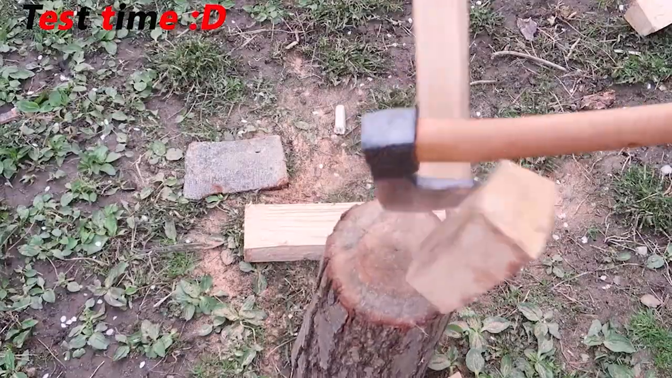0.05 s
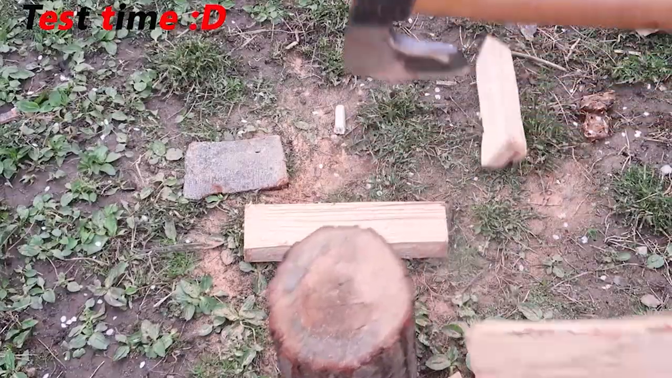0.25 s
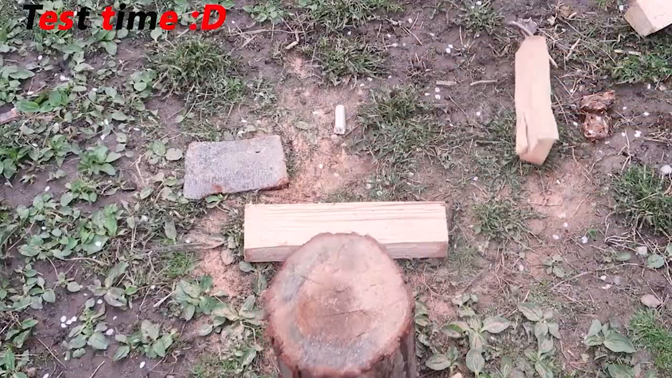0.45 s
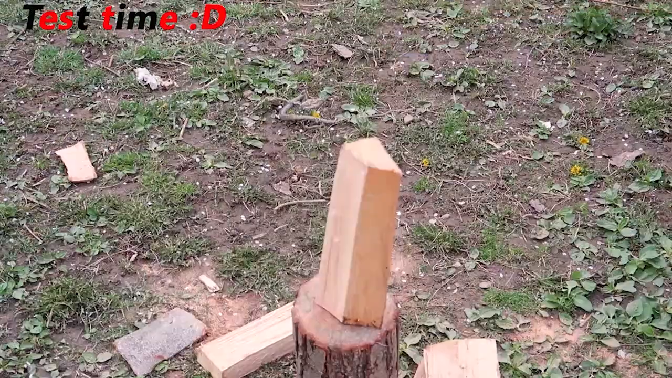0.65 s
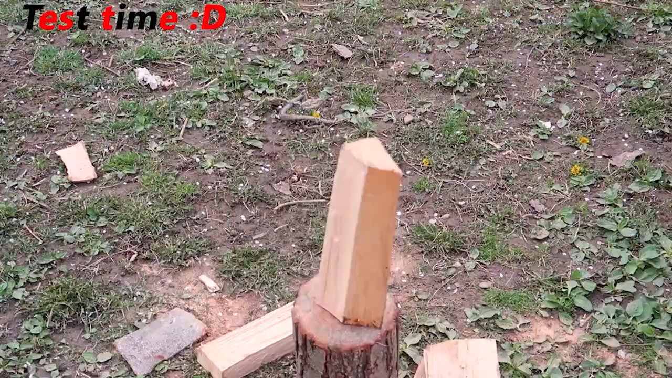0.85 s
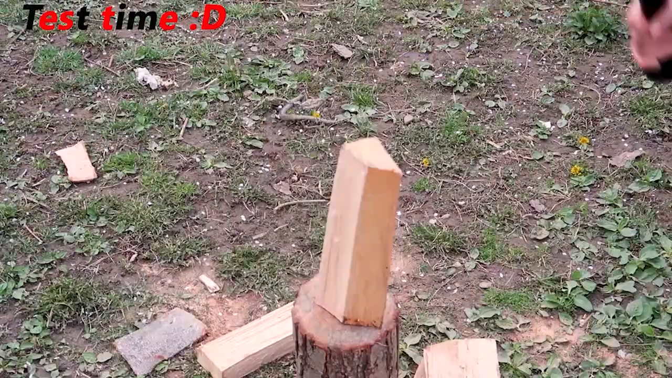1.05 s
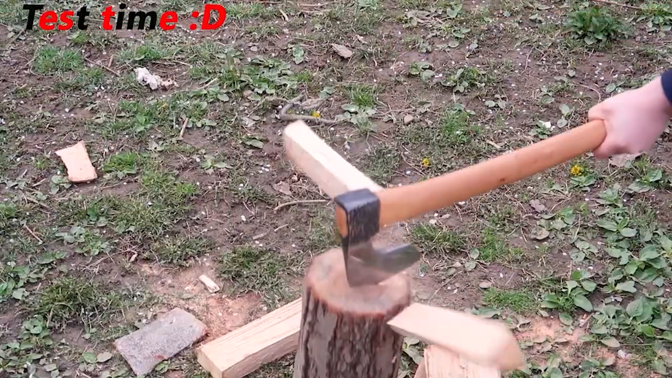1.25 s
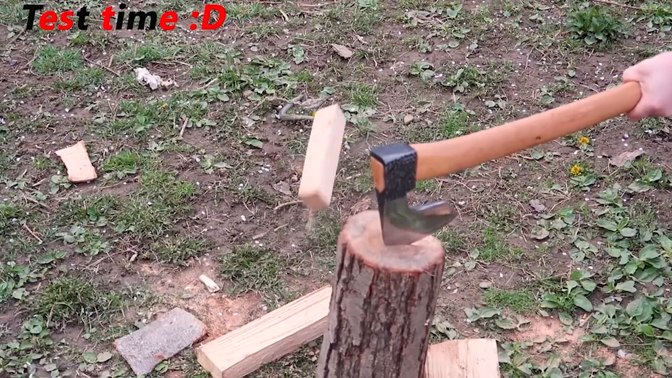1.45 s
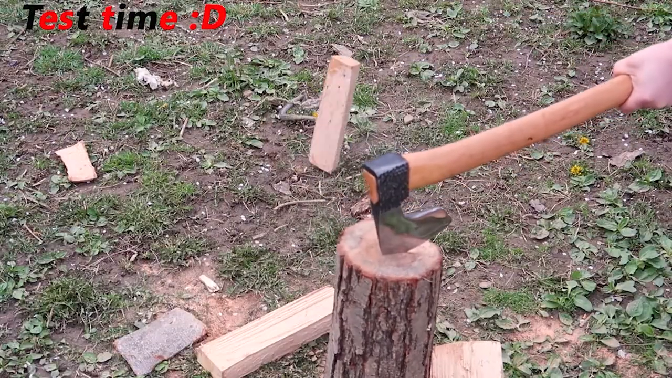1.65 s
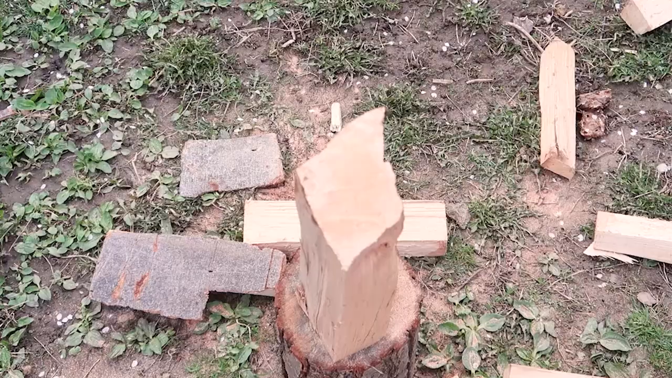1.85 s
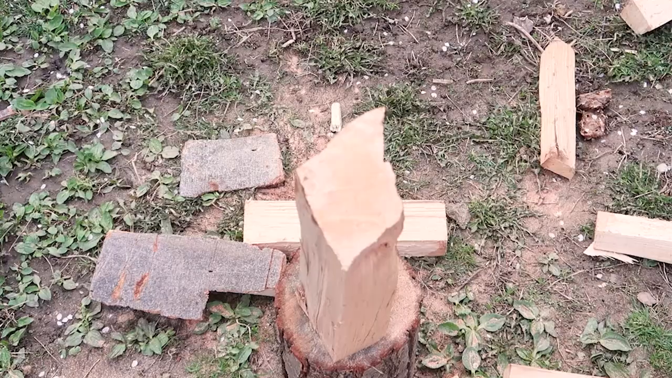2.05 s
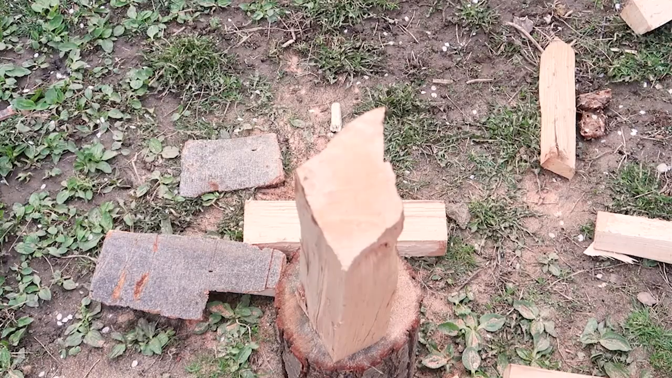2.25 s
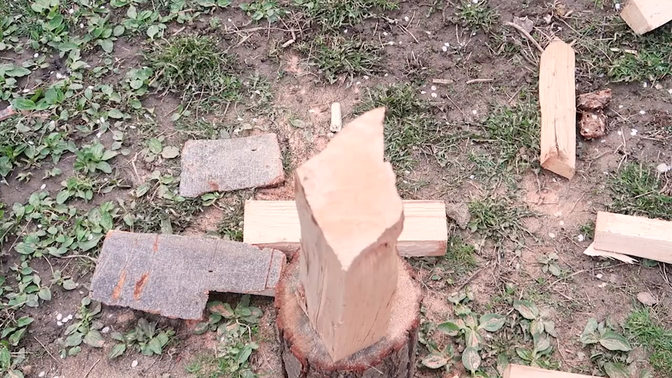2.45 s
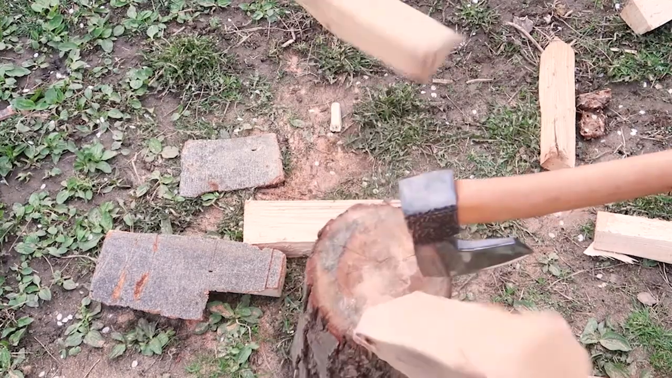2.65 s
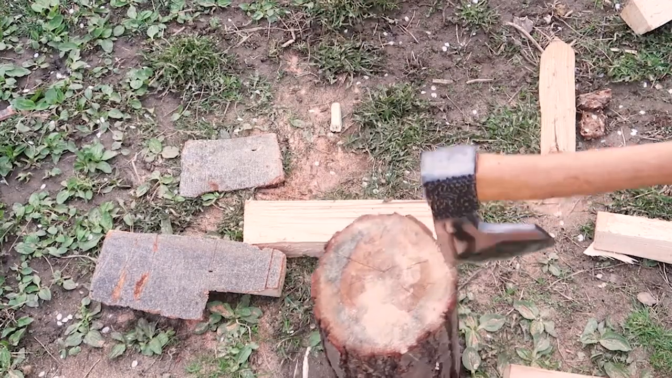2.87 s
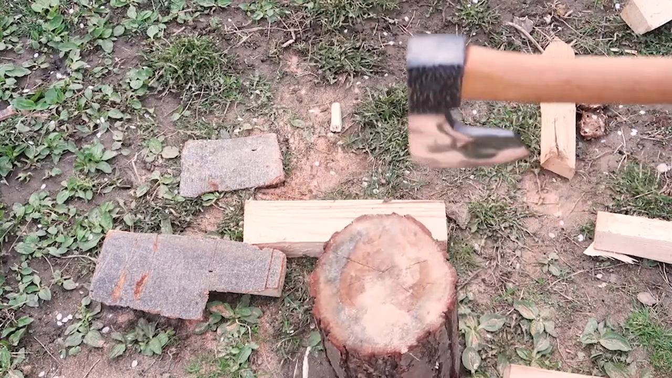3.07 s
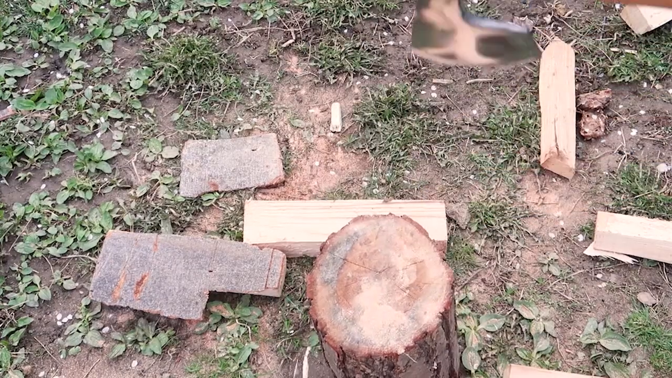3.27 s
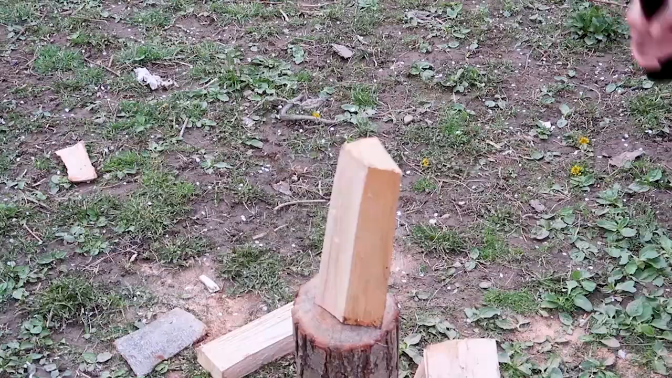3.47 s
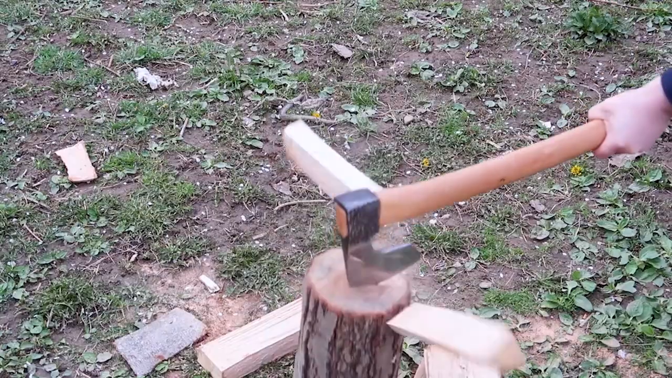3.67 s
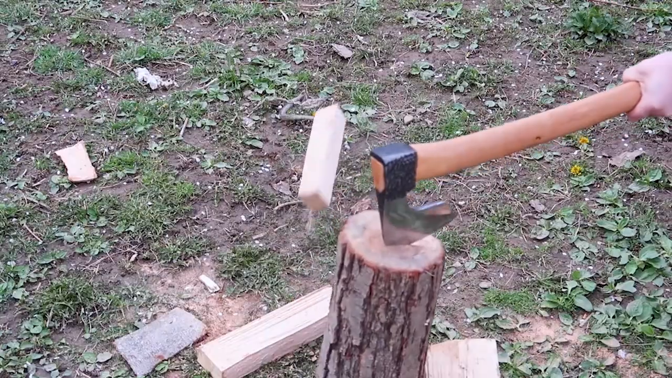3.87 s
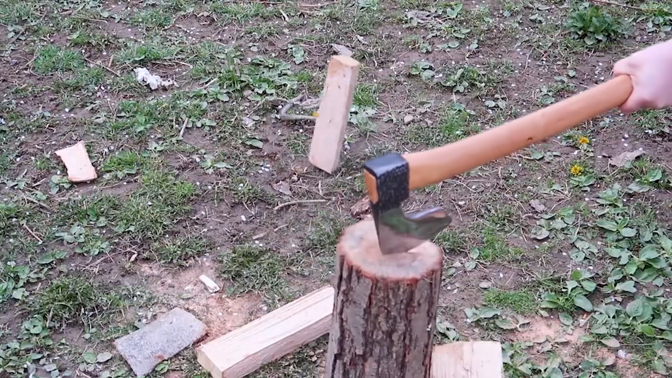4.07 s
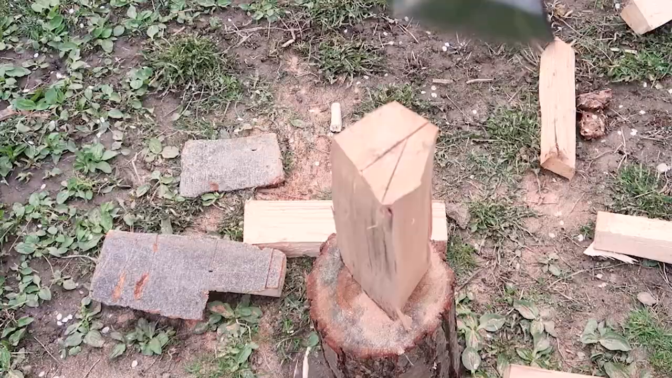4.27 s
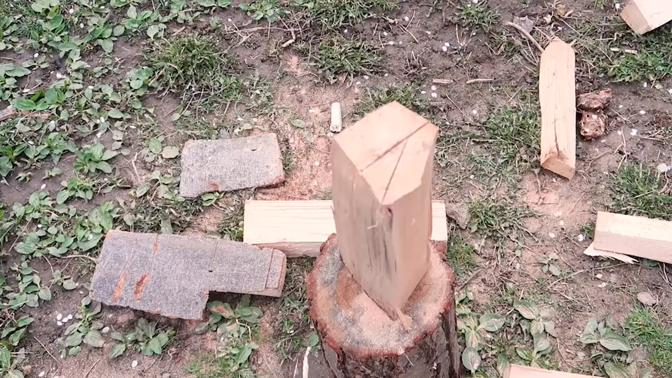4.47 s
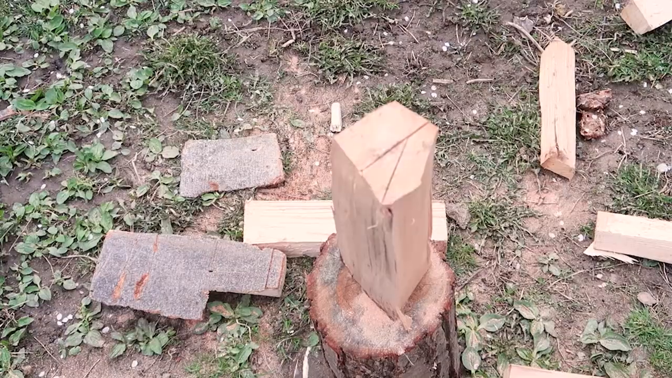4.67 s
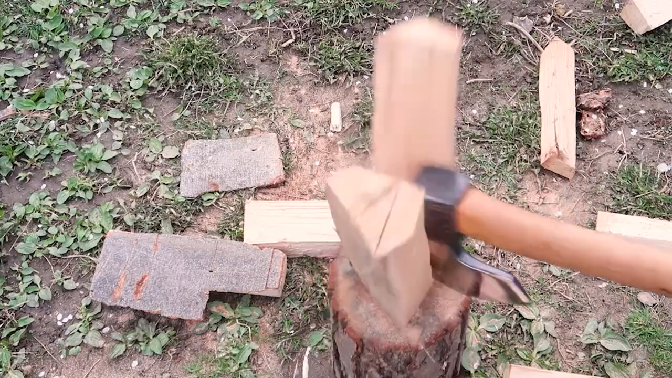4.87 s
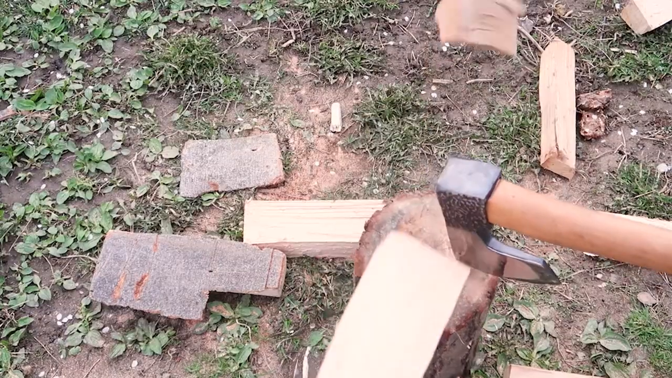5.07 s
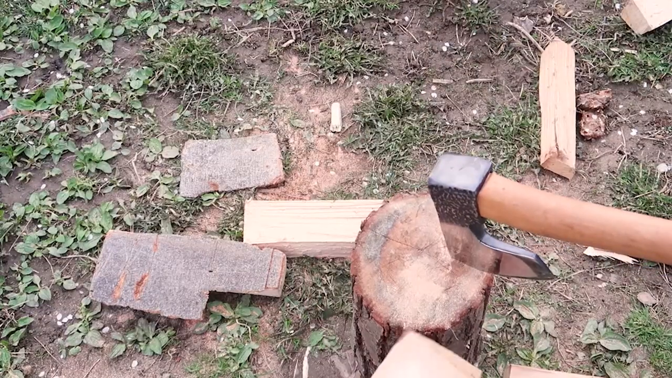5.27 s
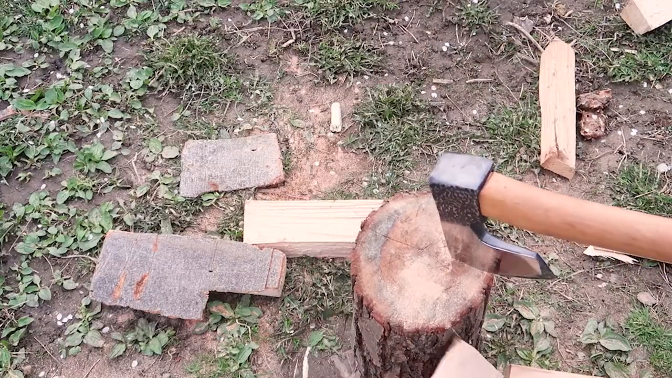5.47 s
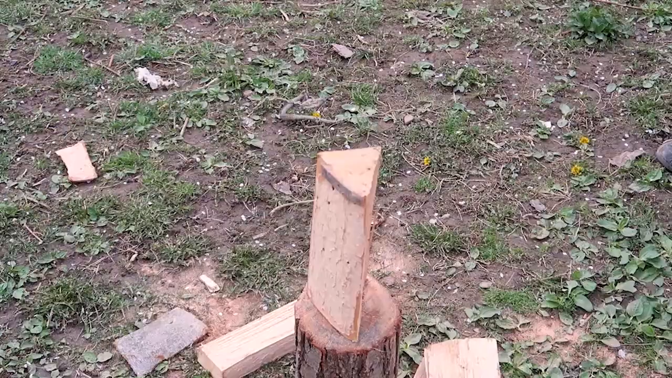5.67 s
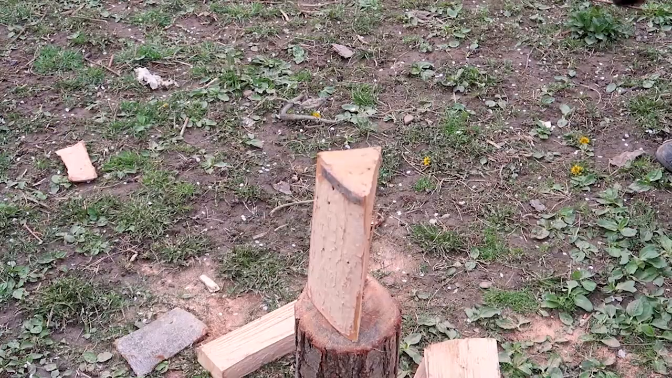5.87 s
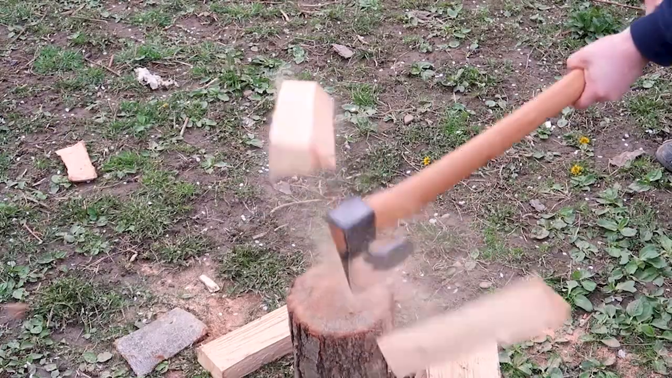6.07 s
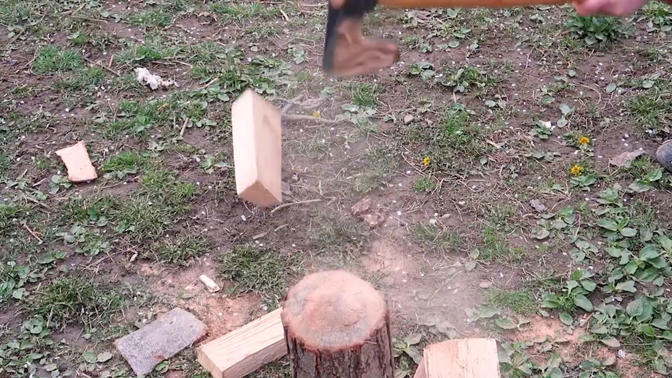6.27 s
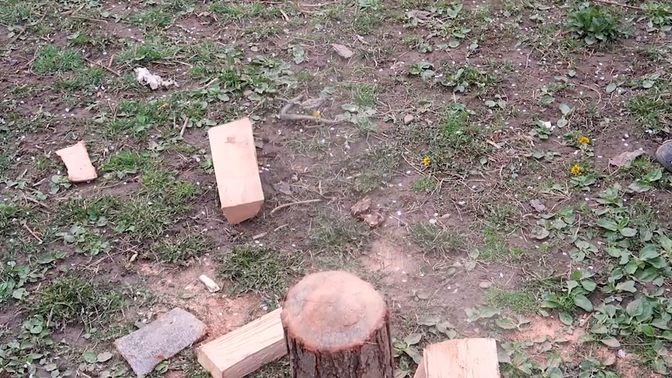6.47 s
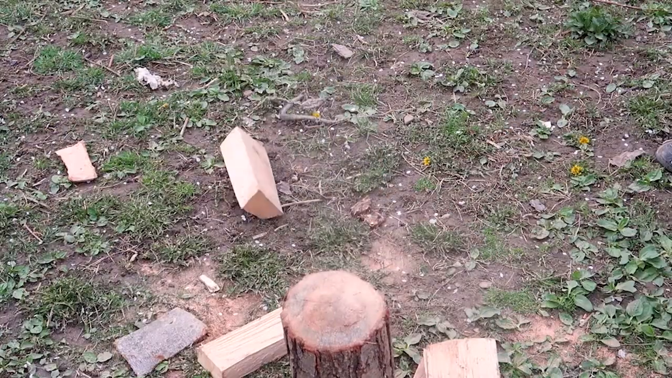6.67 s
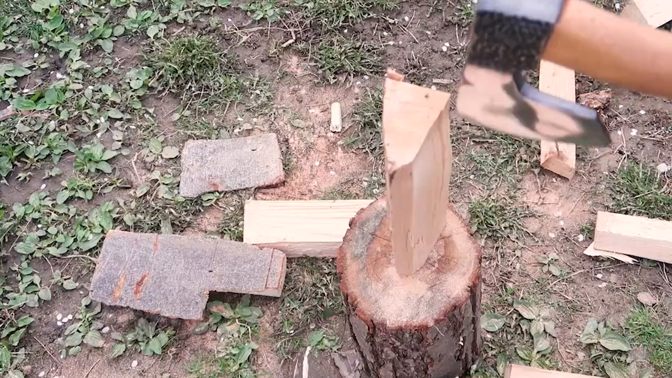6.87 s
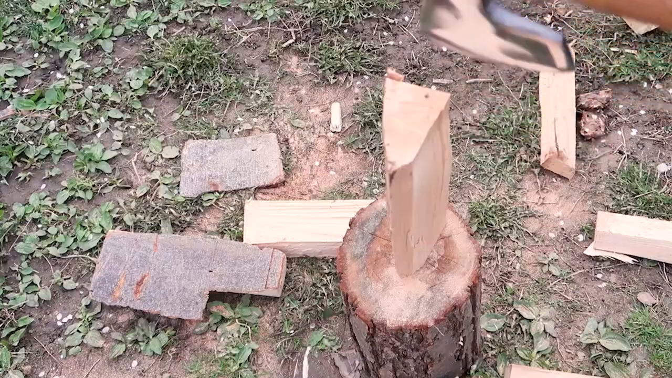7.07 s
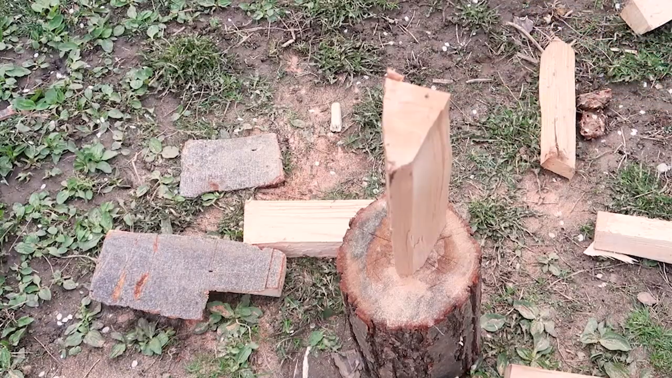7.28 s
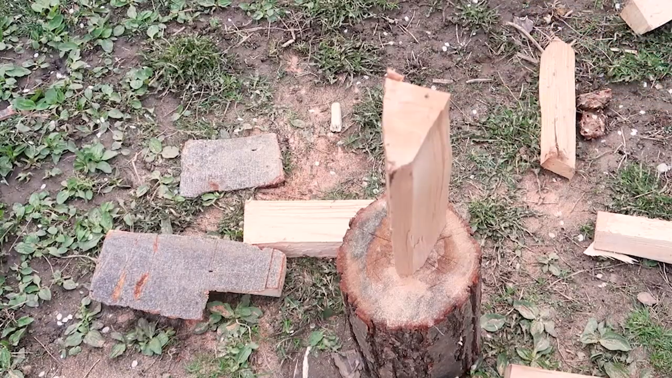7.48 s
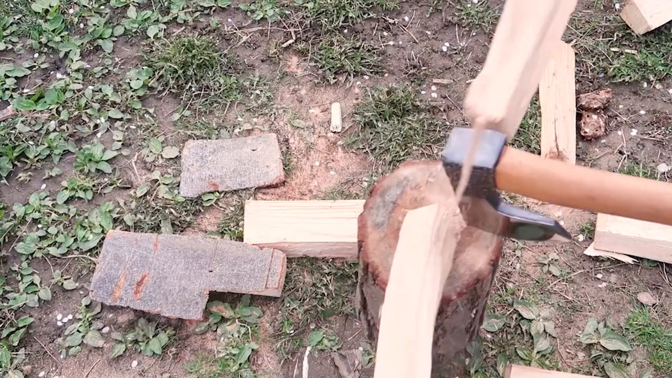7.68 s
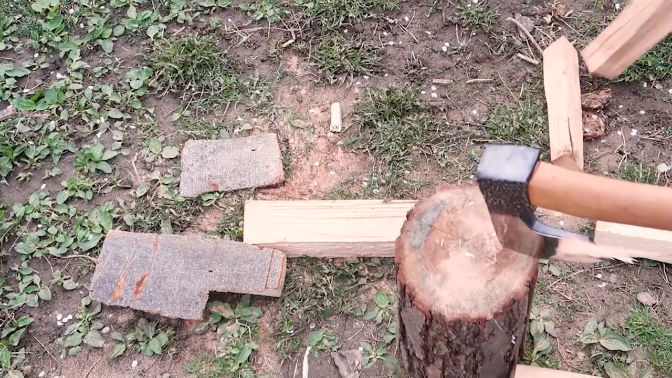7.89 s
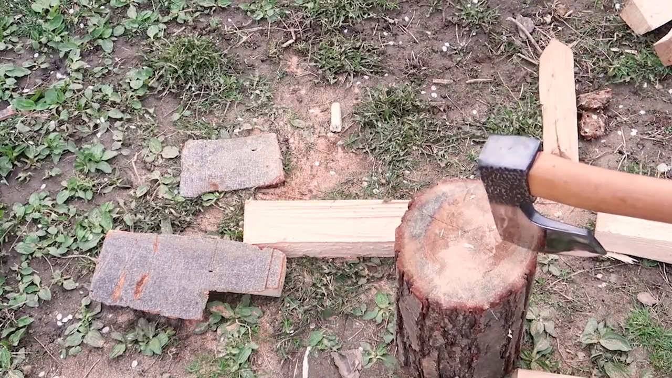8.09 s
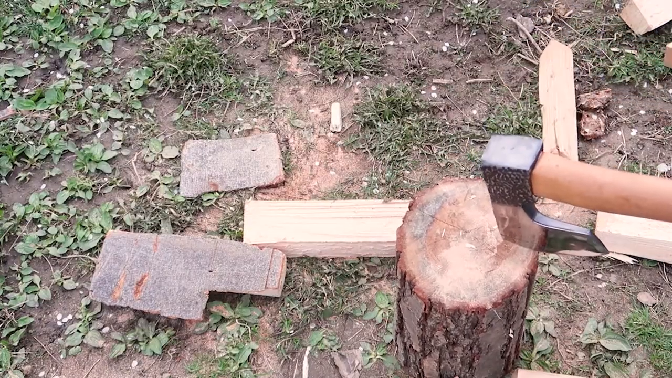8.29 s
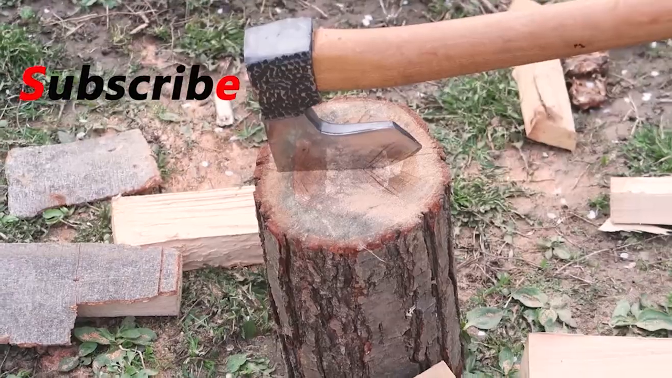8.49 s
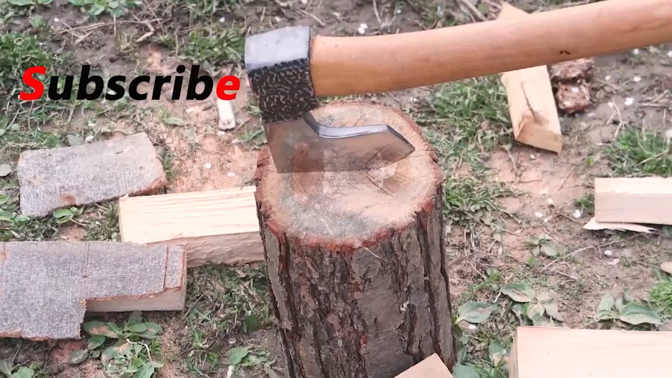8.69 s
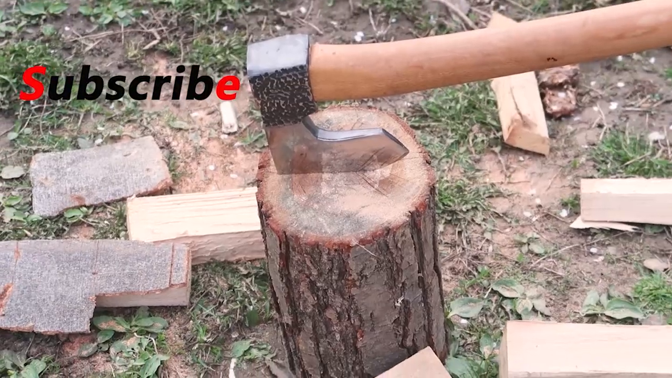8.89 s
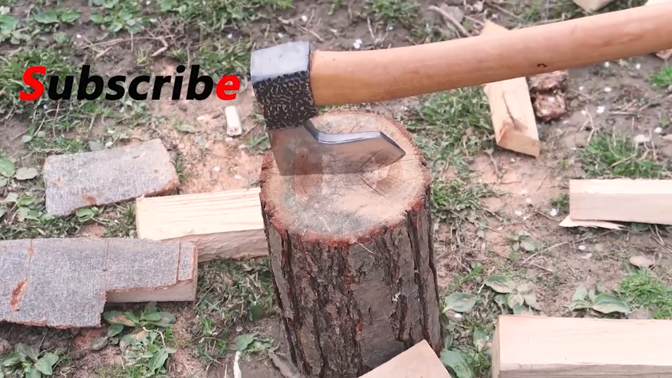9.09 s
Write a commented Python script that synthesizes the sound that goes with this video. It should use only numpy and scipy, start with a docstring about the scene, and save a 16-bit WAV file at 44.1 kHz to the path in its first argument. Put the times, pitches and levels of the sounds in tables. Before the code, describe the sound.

In a quiet yard, a hatchet repeatedly cracks small billets on a log block, close to the microphone and slightly distorted at the peaks. After each blow, loose pieces clack on wood, drop with dull thuds and rustle leaves, while tiny chips tick. Short slapping echoes return. Distant birds slur downward between blows over light wind, airy hiss and a changing engine-like drone; the ending is calm.

```python
"""Splitting firewood in a yard

A hatchet splits billets on a log block, overloading the microphone: band noise cracks over damped modes.
Sticks knock and ring, then land with a thud and rustle; chips patter. Random taps make the yard's echo.
The stretch with the second chop plays again once. Behind: falling bird whistles and one faint hoot
(gliding sines), light wind and far air (coloured noise), and a low far hum (wandering harmonics).
"""
import sys
import numpy as np
from scipy import signal
from scipy.fft import rfft, irfft
from scipy.io import wavfile
from scipy.ndimage import uniform_filter1d

SR = 44100
rng = np.random.default_rng(int(sys.argv[2]) if len(sys.argv) > 2 else 0)


def unload_audio(sound):
    """Save the sound as a 16-bit wav file, at the path given as the first command line argument."""
    columns = np.transpose(np.atleast_2d(sound))
    # keep every value between -1 and 1, then stretch to whole-number steps
    steps = np.round(np.clip(columns, -1, 1) * 32767)
    wavfile.write(sys.argv[1], SR, steps.astype(np.int16))


N = 403069
CROSSFADE_S = 0.03


def amp(db):
    """Converts dB to amplitude."""
    return 10 ** (np.asarray(db) / 20)


def evened(x):
    """Scales to rms 1."""
    return x / np.sqrt(np.mean(x ** 2) + 1e-20)


def read(points, hz):
    """Interpolates a curve on a log-frequency axis."""
    f, value = np.transpose(points)
    return np.interp(np.log(hz + 1), np.log(f + 1), value)


def add(mix, start_s, sound):
    """Mixes a mono or stereo sound in at start_s."""
    part = mix[:, max(round(start_s * SR), 0):][:, :sound.shape[-1]]
    part += sound[..., :part.shape[-1]]


def spread(pair, side_db):
    """Two unrelated signals become middle and side of a stereo pair."""
    mid, side = pair
    return mid + amp(side_db) * side * np.array([[1], [-1]])


def noise(spectrum, side_db):
    """Steady stereo noise of a given colour, rms 1."""
    colour = amp(read(spectrum, np.fft.rfftfreq(N, 1 / SR)))
    pair = irfft(rfft(rng.standard_normal((2, N))) * colour, N)
    return evened(spread(pair, side_db))


def drift(rate_hz):
    """Slow random wavering, rms 1."""
    hz = np.fft.rfftfreq(N, 1 / SR)
    lowpass = np.exp(-(hz / rate_hz) ** 2)
    return evened(irfft(rfft(rng.standard_normal(N)) * lowpass, N))


def swelling(base_db, swells):
    """Gain of a base level with bell-shaped swells added in power."""
    t = np.arange(N) / SR
    power = amp(base_db) ** 2
    for centre_s, db, half_s in swells:
        power = power + amp(db) ** 2 * np.exp(-((t - centre_s) / half_s) ** 2)
    return np.sqrt(power)


def together(a_db, b_db):
    """Level of two unrelated sounds at once."""
    return 20 * np.log10(np.hypot(amp(a_db), amp(b_db)))


def ring(modes, t):
    """Damped modes of a struck piece of wood."""
    return sum(amp(db - 60 * t / t60_s) * np.sin(2 * np.pi * hz * t) for hz, db, t60_s in modes)


# contact bands: (low edge [Hz], high edge [Hz])
BANDS_HZ = [(85, 300), (300, 1200), (1200, 3500), (3500, 7000), (7000, 15500)]


def tilted(colour_db, db, brightness_db_per_octave=0):
    """Band levels of a contact, tipped about 1 kHz by its brightness."""
    centre_hz = np.sqrt(np.prod(BANDS_HZ, axis=1))
    octaves = np.log2(centre_hz / 1000)
    return np.array(colour_db) + db + brightness_db_per_octave * octaves


# stereo width of a contact, per band: side re mid [dB]
SIDE_DB = [-25, -30.5, -15.5, -9.5, -3.5]


def crunch(levels_db, decay_s, rise_s, grain=0.59, top_hz=10500):
    """Snapping fibres or grit: uneven noise under a brief force, band by band."""
    t = np.arange(SR // 10) / SR
    force = (1 - np.exp(-t / rise_s)) * np.exp(-t / decay_s)
    out = np.zeros((2, len(t)))
    for band_hz, db, side_db in zip(BANDS_HZ, levels_db, SIDE_DB):
        snaps = rng.standard_normal((2, len(t))) * np.exp(grain * rng.standard_normal(len(t)))
        bandpass = signal.butter(4, band_hz, "bandpass", fs=SR, output="sos")
        mid, side = signal.sosfilt(bandpass, snaps * force)
        # level refers to power over 10 ms, the buffer is 100 ms
        out += amp(db) * spread([evened(mid), evened(side)], side_db) / np.sqrt(10)
    return signal.lfilter(*signal.butter(2, min(top_hz, SR / 3), fs=SR), out)


def contact(levels_db, decay_s, grit_db=-12, grit_decay_s=0.013):
    """A short crunch plus longer, sparser grit."""
    hit = crunch(levels_db, decay_s, rise_s=0.0033)
    grit = crunch(levels_db, grit_decay_s, rise_s=0.0033, grain=3.3)
    return hit + amp(grit_db) * grit


# hatchet blows: (time [s], ring swell [ms], crack gain [dB], brightness [dB/octave], block thud gain [dB],
# crack decay [s], send to yard [dB])
CHOPS = [(.019, 1.84, -15.5, -1.65, -41, 0.0025, 1.5), (1.2455, 2.16, -16.5, -2.5, -27.5, 0.002, 1),
         (2.6052, 2.02, -14.5, -0.73, -22.5, 0.0017, 2.5), (4.9507, 1.7, -18, 1.3, -23.5, .0036, 0.5),
         (6.069, 2.3, -19, 1.1, -34.5, .0034, 4.5), (7.6357, 1.43, -18.2, 2.25, -35.5, .0025, 0.5)]
# modes of each billet on the block, one table per chop: (frequency [Hz], relative level [dB], t60 [s])
BILLET_1 = [(562, 13, 0.013), (668, 11, 0.017), (920, 0, 0.023), (1170, 21, 0.0065), (1460, -7.5, 0.038),
            (2077, -18.5, 0.028), (2170, 1, 0.0091), (3060, -12.5, 0.014), (3400, -18, 0.012),
            (4850, -15, 0.019)]
BILLET_2 = [(320, 13.5, 0.0074), (622, 12.5, 0.011), (704, 20, 0.0082), (1113, 15.5, 0.009),
            (1395, 20.5, 0.008), (1930, -13, 0.06), (2384, 19.5, 0.007), (2670, -4, 0.013),
            (3500, 11.5, 0.0021), (4000, -1, 0.015)]
BILLET_3 = [(566, 15, 0.011), (647, 10.5, 0.016), (844, 3.5, 0.019), (1247, 16.5, 0.009), (1475, 23, 0.007),
            (1890, 2.5, 0.028), (2510, -21, 0.049), (3230, -8.5, 0.013), (3920, 19.5, 0.0043),
            (4550, 15.5, 0.0054)]
BILLET_4 = [(515, 19.5, 0.011), (610, -1.5, 0.028), (1086, 9.5, 0.014), (1327, 19, 0.007),
            (1536, 16, 0.011), (1762, -1, 0.033), (2443, -15.5, 0.037), (3020, 16.5, 0.0026),
            (3250, -14, 0.0058), (4428, -2, 0.011)]
BILLET_5 = [(319, -12.5, 0.032), (707, 21, 0.0071), (806, -13, 0.029), (1105, 4.5, 0.01), (1530, 7, 0.012),
            (1920, 22.5, 0.0045), (2570, 15.5, 0.0041), (3170, -9.5, 0.0047), (3670, -1.5, 0.0037),
            (4310, -6.5, 0.017)]
BILLET_6 = [(544, 9, 0.01), (622, 11.5, 0.012), (1174, 18.5, 0.0067), (1384, 13.5, 0.0053),
            (1543, -8.5, 0.018), (1860, 16, 0.0055), (2218, 5, 0.0076), (2787, -11, 0.018),
            (3674, 4, 0.013), (5790, 1, 0.014)]
BILLETS = [BILLET_1, BILLET_2, BILLET_3, BILLET_4, BILLET_5, BILLET_6]
# colour of cracking fibres, per band: relative level [dB]
CRACK_DB = [-25, -3, -1, -7, -11.5]
# colour of a dull thud, per band: relative level [dB]
THUD_DB = [0, -11.5, -18.5, -36.5, -40]


def chop(row, modes, tear_db=-14.5, tear_decay_s=0.024, tear_db_per_octave=1.6, radiate_hz=110,
         far_ring_db=-1.5, far_crack_db=-0.5):
    """The blade wedges in: fibres crack and tear while the billet's dull ring swells."""
    _, swell_ms, crack_db, brightness, thud_db, decay_s, send_db = row
    t = np.arange(SR // 10) / SR
    wedge = 1 - np.exp(-(1000 * t / swell_ms) ** 2)
    # a small billet radiates little bass
    body = signal.lfilter(*signal.butter(2, radiate_hz, "highpass", fs=SR), wedge * ring(modes, t))
    crack_levels_db = together(tilted(CRACK_DB, crack_db, brightness), tilted(THUD_DB, thud_db))
    tear_levels_db = tilted(CRACK_DB, crack_db, brightness + tear_db_per_octave)
    crack = crunch(crack_levels_db, decay_s, rise_s=0.0033)
    tearing = amp(tear_db) * crunch(tear_levels_db, tear_decay_s, rise_s=0.0036, grain=0.68)
    fibres = crack + tearing
    near = body + fibres
    # more crack than ring carries into the yard
    carried = amp(send_db) * (amp(far_ring_db) * body + amp(far_crack_db) * fibres)
    return near, carried


# last fibres part: (time [s], gain [dB], brightness [dB/octave])
SPLINTERS = [(1.265, -34, -1.5), (1.2761, -24, -4.5), (1.2797, -22.5, -4.5), (2.6245, -28.5, 1.5),
             (4.977, -30.5, 6.5), (6.081, -19.5, -5), (7.64, -26, 2)]
# colour of a snapping bundle, per band: relative level [dB]
SPLINTER_DB = [-31, -5.5, 0.5, -16.5, -17]


def splinter(row, decay_s=0.003):
    """A bundle of fibres snaps as the halves part."""
    _, db, brightness = row
    return contact(tilted(SPLINTER_DB, db, brightness), decay_s)


# stick knocks on wood: (time [s], contact gain [dB], brightness [dB/octave], ring gain [dB],
# hardness [dB/octave])
KNOCKS = [(.104, -37, 1, -47, 5), (0.126, -41, -5.5, -50.5, 0), (1.289, -25, -3, -57, 3),
          (1.5375, -44, 4, -31.5, -5), (1.548, -41, 0.5, -38, -7), (1.6528, -38.5, -2.5, -44.5, 7),
          (1.669, -46, -0.5, -63, 14), (2.6455, -21.5, -1, -14.5, -0.5), (2.654, -28, -1, -42.5, 2),
          (2.6653, -35, -3, -37, -2), (3.013, -36, 0.5, -61, 0), (3.0194, -32, 2, -49, -15),
          (4.9976, -22.5, 2.5, -20.5, -13), (5.004, -21.5, -1, -56, -2), (5.016, -31, -3, -46, 2),
          (5.035, -35.5, 1.5, -45, -5), (5.281, -22.5, 2, -47, -6), (5.3589, -43, -1, -59, 12),
          (5.4, -30.5, -1, -44, 24), (5.443, -39, -1, -60.5, 22), (5.663, -38, 2.5, -59.5, 0),
          (5.677, -41.5, -6, -62, 0), (6.092, -33, -1, -33.5, -5.5), (6.117, -25.5, -3.5, -36, 3),
          (7.6874, -23.5, -2, -42, 0), (7.706, -41, -3.5, -24, -4), (7.803, -47, -0.5, -63, 0),
          (7.8827, -38, 1, -42, 9), (7.954, -29, 1, -15, -4), (8.14, -58, 8, -43.5, 26),
          (8.212, -51, 5, -51.5, 22), (8.2685, -48, 2, -44, 11), (8.29, -40, 1, -28.5, -2),
          (8.324, -53, -3, -35, 4)]
# modes of the stick split off by each chop: (frequency [Hz], relative level [dB], t60 [s])
STICKS = [
    [(1900, 0, .1), (2600, -3, .05)],
    [(1857, 0, .15), (1970, -7, .12), (2643, -6, .07), (2150, -3, .04), (820, -3, .03)],
    [(2180, 0, .05), (969, -4, .05), (1700, -6, .06), (1400, 2, .02)],
    [(1260, 3, .13), (1593, -6, .07), (2250, -8, .06), (2864, -11, .05)],
    [(2550, 0, .06), (900, 0, .05), (3050, -4, .07)],
    [(1491, 0, .07), (1916, -7, .05), (2100, -12, .04), (2550, -12, .04), (1150, -2, .025)],
]
# colour of wood on wood, per band: relative level [dB]
CLACK_DB = [-15.5, -0.5, -10.5, -22, -30]


def knock(row, decay_s=0.0016, spot_db=6.5):
    """A loose stick strikes wood: a contact crunch and the stick's damped modes."""
    s, contact_db, brightness, ring_db, hardness = row
    modes = STICKS[sum(s > later[0] for later in CHOPS[1:])]
    main_hz = modes[0][0]
    struck = []
    for hz, db, t60_s in modes:
        # hardness tilts modes about the main one, up to an octave above; the spot struck varies them
        tilt_db = hardness * min(np.log2(hz / main_hz), 1)
        struck.append((hz, db + tilt_db + spot_db * rng.standard_normal(), t60_s))
    t = np.arange(SR // 4) / SR
    onset = 1 - np.exp(-t / 0.00092)
    out = np.tile(amp(ring_db) * ring(struck, t) * onset, (2, 1))
    add(out, 0, contact(tilted(CLACK_DB, contact_db, brightness), decay_s))
    return out


# wood lands on earth and dry leaves: (time [s], thud gain [dB], rustle gain [dB], decay [s])
LANDINGS = [(.381, -37.5, -63.5, .005), (0.392, -41.5, -65, 0.025), (0.4775, -35, -50, 0.00075),
            (2.896, -57, -71, .004), (3, -55, -59, 0.0041), (5.2516, -50.5, -62, 0.0022),
            (5.28, -31.5, -49.5, 0.0015), (5.442, -43.5, -65, 0.0018), (5.5087, -65.5, -54, 0.0038),
            (6.367, -41, -53.5, 0.0027), (6.405, -40, -66, 0.0042), (6.439, -36.5, -56.5, 0.0036),
            (6.465, -47, -63, 0.0049), (7.9477, -44, -42, 0.0023), (7.954, -36.5, -38.5, 0.0026),
            (8.065, -50, -53.5, 0.0029), (8.1293, -45.5, -48, 0.0021), (8.2005, -73, -55, 0.023),
            (8.318, -45.5, -59.5, .005)]
# colour of dry leaves, per band: relative level [dB]
RUSTLE_DB = [-23, -5, 3, -2, -6]


def landing(row):
    """Soft ground damps the stick: only a thud and a rustle of leaves."""
    _, thud_db, rustle_db, decay_s = row
    return contact(together(tilted(THUD_DB, thud_db), tilted(RUSTLE_DB, rustle_db)), decay_s)


def chips(count=3, earliest_s=0.26, latest_s=0.42, mean_db=-66, vary_db=3, decay_s=0.0018):
    """A few chips tick into the leaves at random delays after each blow."""
    out = np.zeros((2, N))
    for chop_s, *_ in CHOPS:
        for _ in range(count):
            delay_s = rng.uniform(earliest_s, latest_s)
            db = mean_db + rng.uniform(-vary_db, vary_db)
            add(out, chop_s + delay_s, contact(tilted(RUSTLE_DB, db), decay_s))
    return out


# echo colour: (frequency [Hz], level [dB])
YARD_DB = [(100, -21.5), (500, -31.5), (1300, -18), (2900, -11), (6000, -18.5), (12000, -20)]
# echo decay: (frequency [Hz], t60 [s])
YARD_T60 = [(100, 0.79), (1000, 0.55), (3000, 0.37), (6000, 0.37), (12000, 0.4)]


def yard(x, near_db=3, near_decay_s=0.029, wall_s=0.0198, wall_db=14, wall_spread_s=0.00044, lumpy_db=3):
    """Scatter from the ground nearby, one smeared wall echo, and a short, lumpy open-air tail."""
    t = np.arange(SR * 2 // 3) / SR
    shape = np.clip(t / 0.0028, 0, 1) ** 2 * (1 + amp(near_db) * np.exp(-t / near_decay_s))
    # separate trees and fences return the sound in clumps
    shape *= amp(lumpy_db * evened(uniform_filter1d(rng.standard_normal(len(t)), size=130)))
    shape += amp(wall_db) * (t > wall_s) * np.exp(-abs(t - wall_s) / wall_spread_s)
    signs = rng.choice([-1., 1.], (2, len(t)))
    sparse = rng.random((2, len(t))) < 0.2
    taps = signs * sparse * shape
    hz, age_s, z = signal.stft(spread(taps, side_db=-9.5), SR, nperseg=256)
    z = z * amp(-60 * age_s / read(YARD_T60, hz)[:, None])
    tail = signal.istft(z, SR, nperseg=256)[1]
    coloured = signal.istft(z * amp(read(YARD_DB, hz))[:, None], SR, nperseg=256)[1]
    impulse = coloured / np.linalg.norm(tail[0])
    return signal.fftconvolve(x.mean(0)[None], impulse, axes=1)[:, :N]


LIFT_S, CREST_S, FALL_PER_S = 0.016, 0.02, 5.6  # rise, crest roundness, fall as share of pitch per s


def whistle(fall_s, crest_hz, db, waver=0.0097, late=1.6, flutter_db=2):
    """A near-sine note that lifts to a crest, then slurs down at a steady rate."""
    t = np.arange(-LIFT_S, fall_s, 1 / SR)
    hz = crest_hz * (1 - FALL_PER_S * (np.hypot(t, CREST_S) - CREST_S))
    hz *= 1 + waver * evened(uniform_filter1d(rng.standard_normal(len(t)), size=150))
    # loudest in its fall, with an uneven swell
    swell = abs(np.sin(np.pi * np.linspace(0, 1, len(t)) ** late)) ** 0.5
    swell *= amp(flutter_db * evened(uniform_filter1d(rng.standard_normal(len(t)), size=400)))
    return amp(db) * evened(swell * np.sin(2 * np.pi * np.cumsum(hz) / SR))


# bird whistles: (crest time [s], fall length [s], nominal crest pitch [Hz], level before path gain [dB])
WHISTLES = [(.44, 0.068, 3450, -65), (0.561, 0.077, 4130, -58), (.738, 0.065, 4100, -58),
            (.822, 0.095, 4150, -59.5), (.937, 0.052, 2920, -56.5), (1.462, .055, 3100, -64),
            (1.563, 0.048, 3190, -66), (1.69, 0.061, 3200, -66), (1.925, 0.03, 4190, -68),
            (2.115, 0.038, 4326, -70.5), (4.385, 0.065, 3900, -61), (4.61, .045, 3900, -65.5),
            (5.784, .092, 4250, -55.5), (5.987, 0.17, 4280, -55), (6.9, 0.027, 3900, -65.5),
            (6.98, 0.06, 4230, -71), (7.394, 0.045, 3170, -65)]


def birds(direct_db=-4, reflection_db=-17, reflection_s=0.022, yard_db=1):
    """Distant calls, each trailed by one reflection and the yard's echo."""
    calls = np.zeros((2, N))
    for crest_s, *note in WHISTLES:
        call = whistle(*note)
        add(calls, crest_s - LIFT_S, call)
        add(calls, crest_s - LIFT_S + reflection_s, amp(reflection_db - direct_db) * call)
    return amp(direct_db) * calls + amp(yard_db) * yard(calls)


# far hoot: (start [s], length [s], nominal end pitch [Hz], nominal crest pitch [Hz], mean crest level [dB])
HOOT = (8.83, .2, 495, 525, -58)


def hoot():
    """One soft far note: a wavering sine that arches up and sinks again."""
    start_s, length_s, end_hz, crest_hz, db = HOOT
    arch = np.sin(np.pi * np.clip((np.arange(N) / SR - start_s) / length_s, 0, 1))
    hz = end_hz + (crest_hz - end_hz) * arch + 4 * drift(40)
    tone = np.sqrt(2) * np.sin(2 * np.pi * np.cumsum(hz) / SR)
    return amp(db + 2 * drift(30.03)) * arch * tone


# wind colour: (frequency [Hz], relative density [dB/Hz])
WIND = [(15, -24.5), (30, -11.5), (48, 1.5), (75, -3), (120, -7.5), (200, -16), (400, -36), (1500, -69.5),
        (8000, -110)]
# strongest puffs: (time [s], level [dB], half length [s])
GUSTS = [(0.483, -44, 0.05), (3.028, -41, 0.063), (3.313, -41.5, 0.1), (4.429, -45.5, 0.041),
         (4.75, -47, 0.03), (5.247, -39.5, 0.0092), (6.472, -49, 0.075), (8.656, -45.5, .018),
         (8.99, -47.5, .025)]


def wind(wind_db, lumpy_db=1.5, lumps_hz=8):
    """Lumpy low rumble at the microphone that swells in short puffs."""
    return swelling(wind_db + lumpy_db * drift(lumps_hz), GUSTS) * noise(WIND, side_db=-18.5)


# colour of the three parts of the air: (frequency [Hz], relative density [dB/Hz])
MURMUR = [(60, -11), (200, 1), (500, 2), (700, -3.5), (1200, -19), (3000, -51), (12000, -89.5)]
MIDDLE = [(200, -34.5), (500, -12.5), (800, 0), (1400, -2), (2200, -8), (3000, -17), (6000, -40),
          (12000, -80)]
HISS = [(1000, -29.5), (2400, -5.5), (3200, -1.5), (5000, -7), (8000, -12.5), (10500, -17.5), (12000, -36),
        (16000, -50)]
# brief swells of high noise: (time [s], level [dB], half length [s])
HIGH_SWELLS = [(1.957, -71, 0.038), (2.38, -63.5, 0.075), (4.41, -67.5, 0.042), (4.634, -66, .05)]


def air(murmur_db, middle_db, hiss_db, flutter_db=0.9):
    """Far outdoor murmur and leaf hiss: three coloured noises, gently wavering; brief bright swells of noise
    ride on the top one."""
    parts = [noise(MURMUR, side_db=-11.5), noise(MIDDLE, side_db=-8), noise(HISS, side_db=2.5)]
    gains = [amp(murmur_db), amp(middle_db), swelling(hiss_db, HIGH_SWELLS)]
    return sum(part * gain * amp(flutter_db * drift(17)) for part, gain in zip(parts, gains))


# hum partials: (multiple of fundamental, relative level [dB])
HUM_PARTIALS = [(1, 0.5), (2, -11.5), (3, -20), (4, -24)]
SAG_S, SAG_HZ, SAG_HALF_S = 0.94, 6, 0.42  # pitch dip: time, depth, half length


def hum(hz, db, waver=0.0065, flutter_db=2):
    """A low drone like a far engine, wandering in pitch and sagging once as if under load."""
    t = np.arange(N) / SR
    sag_hz = SAG_HZ * np.exp(-((t - SAG_S) / SAG_HALF_S) ** 2)
    turns = np.cumsum((hz - sag_hz) * (1 + waver * drift(11.0))) / SR
    tone = np.zeros(N)
    for multiple, partial_db in HUM_PARTIALS:
        gain = amp(partial_db + flutter_db * drift(4.5))
        tone += gain * np.sin(2 * np.pi * round(multiple) * turns)
    return amp(db) * evened(tone)


# background stretches: (start [s], murmur [dB], middle [dB], hiss [dB], wind [dB], nominal hum pitch [Hz],
# hum gain [dB])
STRETCHES = [(0, -59.5, -62, -70.5, -58.5, 60.13, -47), (1.92, -60, -58.5, -70, -55.5, 60.85, -67),
             (4.34, -60.5, -62.5, -68.5, -58, 46.52, -64), (5.7, -58, -61.5, -68.5, -56, 65, -56.5),
             (6.801, -58.5, -60, -70, -58, 63.37, -67), (8.451, -65, -69.5, -71, -58, 64.2, -84)]


def background():
    """Wind, air and hum, whose base settings hold through each stretch and glide to the next."""
    starts_s, *columns = np.transpose(STRETCHES)
    which = np.searchsorted(starts_s[1:], np.arange(N) / SR)
    glide = max(int(CROSSFADE_S * SR), 1)
    curves = [uniform_filter1d(column[which], glide) for column in columns]
    murmur_db, middle_db, hiss_db, wind_db, hum_hz, hum_db = curves
    return wind(wind_db) + air(murmur_db, middle_db, hiss_db) + hum(hum_hz, hum_db)


# repeated stretch: (start [s], end [s], delay [s])
REPLAY = (1.04, 1.92, 2.41909)


def replay(out):
    """Crossfades to a delayed copy of one stretch, then back."""
    start, end, delay = (round(s * SR) for s in REPLAY)
    inside = (np.arange(N) >= start + delay) & (np.arange(N) < end + delay)
    share = np.clip(uniform_filter1d(1. * inside, max(int(CROSSFADE_S * SR), 1)), 0, 1)
    angle = share * np.pi / 2
    return np.cos(angle) * out + np.sin(angle) * np.roll(out, delay, axis=1)


def scene():
    """Wood sounds and their echo, chips, birds and hoot over the background; one stretch plays twice."""
    wood, sent = np.zeros((2, 2, N))
    for row, modes in zip(CHOPS, BILLETS):
        blow, carried = chop(row, modes)
        add(wood, row[0], blow)
        add(sent, row[0], carried)
    for source, rows in [(splinter, SPLINTERS), (knock, KNOCKS), (landing, LANDINGS)]:
        for row in rows:
            hit = source(row)
            add(wood, row[0], hit)
            add(sent, row[0], hit)
    return replay(wood + chips() + yard(sent) + birds() + hoot() + background())


def record(dry, threshold_db=-25, duck_share=0.16, attack_s=0.14, recover_db_per_s=18, edge_hz=15700):
    """Blows flatten near full scale, a sluggish gain control ducks what follows, then a band limit."""
    clipped = dry / (1 + dry ** 8) ** (1 / 8)
    power_db = 10 * np.log10(abs(uniform_filter1d((clipped ** 2).mean(0), size=400)) + 1e-12)
    # peak hold that falls at a steady rate
    fall_db = recover_db_per_s * np.arange(N) / SR
    held_db = np.maximum.accumulate(power_db + fall_db) - fall_db
    over_db = np.maximum(held_db - threshold_db, 0)
    keep = np.exp(-1 / (attack_s * SR))
    ducked = clipped * amp(-duck_share * signal.lfilter([1 - keep], [1, -keep], over_db))
    lowpass = signal.firwin(511, edge_hz, window=("kaiser", 9), fs=SR)
    return signal.oaconvolve(ducked, lowpass[None], "same")


dry = scene()
out = record(dry)
unload_audio(out)
```